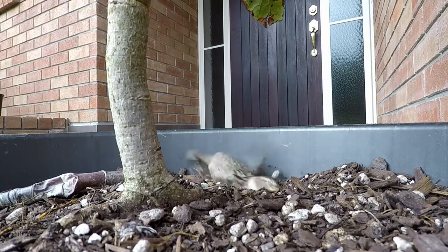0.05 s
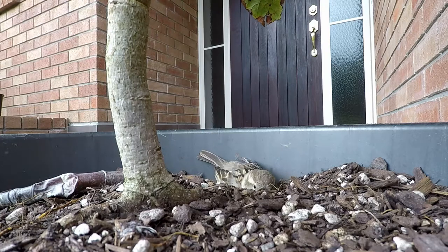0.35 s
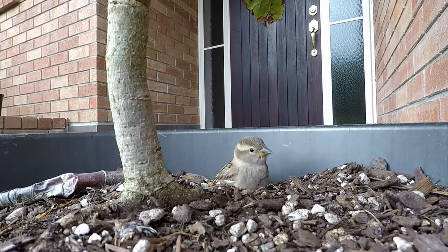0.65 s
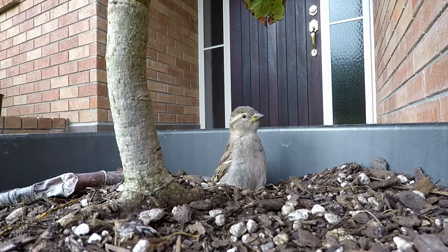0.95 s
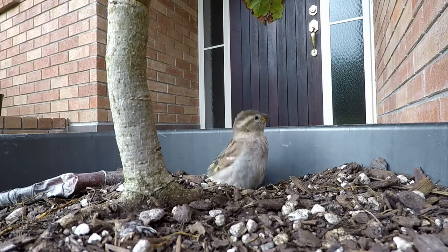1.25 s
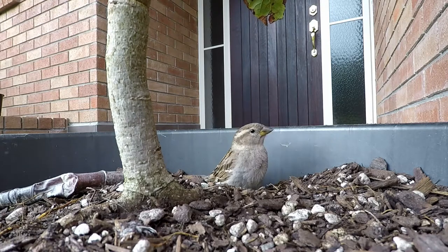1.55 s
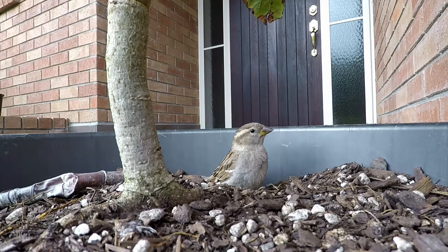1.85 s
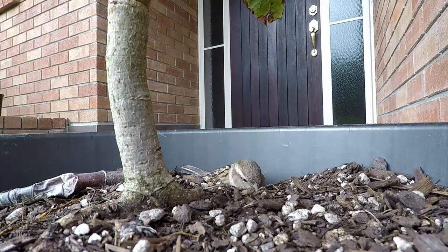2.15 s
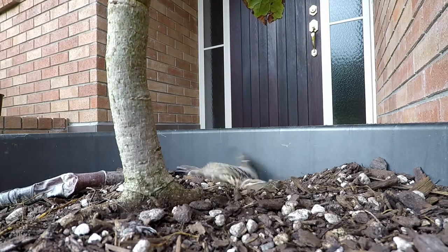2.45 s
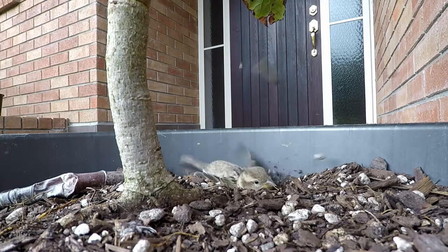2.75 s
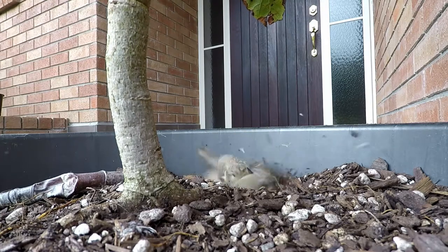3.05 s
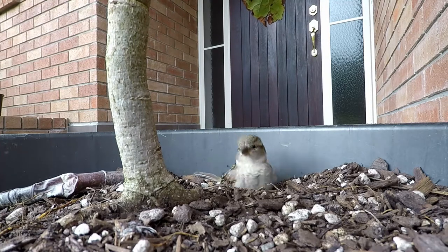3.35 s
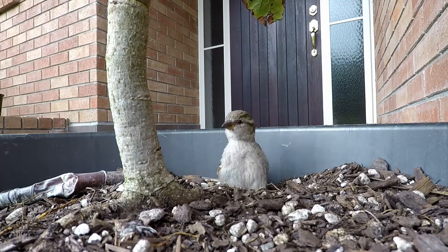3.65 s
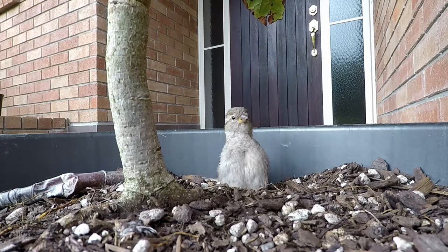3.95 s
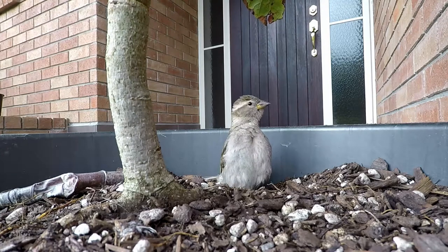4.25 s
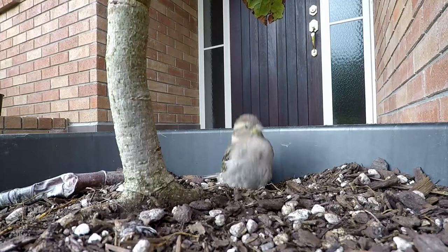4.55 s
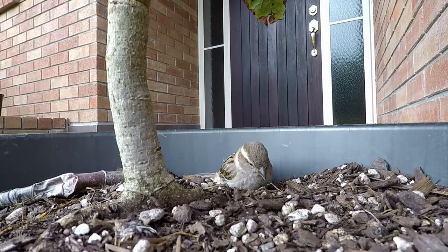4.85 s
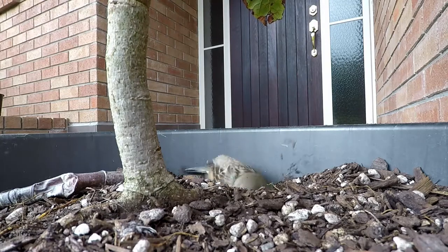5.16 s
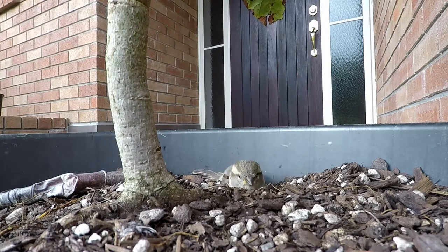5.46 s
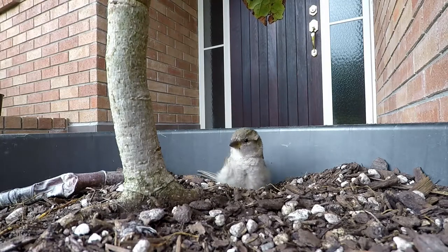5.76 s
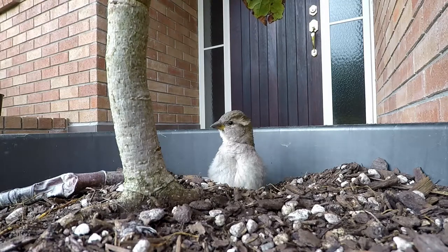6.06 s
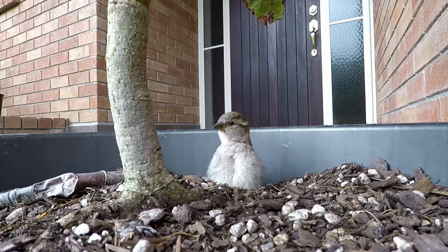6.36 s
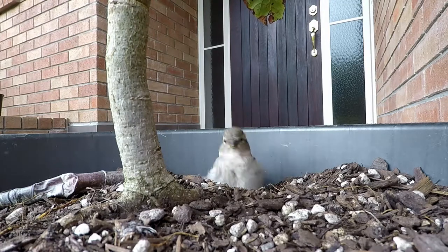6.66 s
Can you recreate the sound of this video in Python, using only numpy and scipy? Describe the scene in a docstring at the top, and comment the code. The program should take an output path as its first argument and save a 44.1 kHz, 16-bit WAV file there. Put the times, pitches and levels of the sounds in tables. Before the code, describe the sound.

A sparrow dust-bathes in a plant pot right beside the microphone. Three short bursts of soft, low wing flutter scuff dry soil and bark and send grit ticking against the pot. In the second burst a pebble knocks sharply on the microphone. Faint chirps and far hoots fill the pauses over quiet town rumble, and one nearer chirp follows the last burst.

```python
"""A sparrow dust-bathes in a plant pot, a hand's width from a small camera on the mulch.
In three bouts its wings puff air at the two microphone ports, scuff soil and bark, and fling grit
that ticks on the pot and the camera. Other birds chirp across the yard between brick walls, with
faint far hoots and one nearer call, over quiet town rumble and hiss."""
import sys
import numpy as np
from scipy import signal
from scipy.fft import rfft, irfft, next_fast_len
from scipy.io import wavfile
from scipy.ndimage import uniform_filter1d

SR = 44100
rng = np.random.default_rng(int(sys.argv[2]) if len(sys.argv) > 2 else 0)


def put_to_file(sound):
    """Save the sound as 16-bit audio at rate SR, in the file named by the first command-line argument."""
    columns = np.atleast_2d(sound).T  # one column per channel
    safe = np.clip(columns, -1, 1)
    whole_steps = np.round(safe * 32767)
    wavfile.write(sys.argv[1], SR, whole_steps.astype(np.int16))


N = 304731

# outdoor air, common to the ports and differing between them: freq_hz, density_db
AIR_MID = [(150, -77), (200, -76), (280, -81), (450, -86), (700, -90), (1000, -92.5), (1600, -95.5),
           (2600, -99), (4400, -102), (5800, -99), (7800, -102), (10000, -104), (13000, -111),
           (15000, -119)]
AIR_SIDE = [(150, -77.5), (200, -76), (280, -79.5), (450, -81), (700, -81), (1000, -82.5), (1600, -90),
            (2600, -99), (4400, -106), (5800, -100), (7800, -102), (10000, -104), (13000, -111),
            (15000, -118)]
# grains and chips landing: start_s, level_db, ring_hz, ring_db, tilt_db_per_octave, body_db, skid_db
GRAIN_HITS = [(0.0025, -36.5, 1230, 10, -1.0, 6, 20), (0.0103, -41, 1230, 9, -2, 11, -2),
              (0.059, -42, 4990, 11, -3, 4, 12), (0.076, -35.5, 1620, 11, -7.5, -5, 0),
              (0.0902, -42, 5870, 7, 2, 4, 4), (0.107, -42.5, 2400, 15, 1.0, 2, 10),
              (0.114, -43.5, 5870, 6, -7, -3, 2), (0.125, -50.5, 1250, 7, -5, -4, 6),
              (0.1378, -37.5, 1700, 10, 0, 8, -9), (0.151, -46.0, 1600, 13, -12, 4, -8),
              (0.1656, -37, 2380, 11, -1.5, 12, 8), (0.235, -45, 1710, 14, -2.5, -1, 8),
              (0.341, -43, 1470, 11, -11, 2, 14), (0.3563, -36, 1720, 6.5, -4, -8, -6),
              (0.36, -44, 1730, 8, -3, 5, -4), (0.447, -47, 1370, 3, -3, 2, 12),
              (1.333, -52, 3910, 13, 0, 2, 12), (2.5289, -34.5, 1360, 4, -9, 1, -11),
              (2.5638, -20, 1750, 4.5, -1, -3, -8), (2.5775, -37, 4600, 6, 1, 5, 2),
              (2.598, -40, 2820, 6, -3.5, -1, -2), (2.624, -36.5, 4990, 16, -5.5, 4, 12),
              (2.6512, -44.0, 1250, 7, -3, 4, 7), (2.701, -35.5, 5410, 6, -5.5, -10, -5),
              (2.707, -34.5, 5870, 4, -4, -13, -11), (2.8166, -44, 4600, 14, 5.5, 4, -1),
              (2.8885, -46, 1600, 3, -5, -1, 6), (2.924, -29.5, 5870, 6.5, -3, -14, -11),
              (2.9677, -41.5, 1360, 5, 1, 4, -3), (3.0154, -30.5, 3520, 13, 2.5, 8, -8),
              (3.0283, -43.5, 1470, 2, -1, 6, -3), (3.0378, -41, 3060, -1, -1, 4, -4),
              (3.066, -29.5, 1200, 7, 2.5, 18, -3), (3.1659, -37.5, 1730, 11, 4.5, 8, -4),
              (3.1717, -40.5, 3910, 12, 0.0, 8, -10), (3.2035, -49, 6370, 2, 5, 2, -11),
              (3.23, -49, 2820, 6, 8, 2, -12), (3.3843, -38.5, 2160, 8, -3, 16.5, 11),
              (3.442, -45, 1250, 0, -3.5, 4, 6), (3.499, -49.5, 1250, 8, 1, 4, 1),
              (3.56, -42, 5870, 8.5, 2, 7, -15), (3.603, -47.5, 5870, 10, 4, 4, -11),
              (4.6992, -50, 3370, 4, 2.0, -2, 10), (4.714, -53, 3910, 17, 2, 4, 10),
              (5.1932, -42.5, 5000, 13, -2, 7, 8), (5.215, -42, 4640, 9, 5, 4, 2),
              (5.293, -49, 1730, 17, -0.5, 4, 4), (5.367, -45.5, 1600, 7, -3, 4, -7),
              (5.38, -42, 1590, 6, 1.5, 4, 4), (5.395, -34, 1260, 6.5, -2, -7, 3),
              (5.404, -48, 2820, 7, 3.0, 3, -6), (5.4772, -49.5, 2230, 9, -2, 4, 0),
              (5.5485, -53, 2210, 21, 0, 4, -4), (5.617, -41, 1740, -1, -5, -14, 20),
              (5.8043, -50, 1600, 9, -0.5, 1, 3)]
# a pebble bouncing on the camera: start_s, level_db, thud_db, skid_db, ring_hz, ring_db
PEBBLE_HITS = [(2.7768, -19.7, -8, -6, 4050, 9), (2.7817, -35, -6, 3, 2100, 7),
               (2.7872, -17.4, 0, -6, 3350, 9), (2.7916, -32, 7, 0, 1900, 5)]
# resonances of every grain tick and of the camera case: freq_hz, gain_db
TICK_SPECTRUM = [(200, -17), (450, -9.5), (800, -16), (1100, -1.5), (1400, 3.5), (1700, 3), (2100, -2),
                 (2600, -6.5), (3300, -1.5), (4500, -11), (5200, -5.5), (5900, -2), (6800, -3.5),
                 (8200, -11.5), (12000, -22), (15000, -32)]
CASE_SPECTRUM = [(200, -0.5), (550, -9), (1000, -8.5), (1600, 1), (2000, -2), (2500, 2), (2900, -3),
                 (3450, -17.5), (4050, -13), (4550, -21), (5700, -8), (7500, -25), (9500, -27.5),
                 (12500, -37), (15000, -55)]
# left port ahead of right, from the soil and through the case: freq_hz, lead_rad
SOIL_PHASE = [(150, 0.5), (450, 3), (800, 2.5), (1270, 1.72), (1650, 1.21), (2300, 1.5), (3200, 0.56),
              (4300, -0.1), (5700, -1.64), (7200, -1.5), (10000, -1.5)]
CASE_PHASE = [(700, -.2), (1270, -1.3), (1650, -.5), (2300, .7), (3200, .5), (4300, -.6), (5700, -1.7)]
# wing beats: downstroke_s, puff_db, swirl_db, nominal_hz, upstroke_vs_down_db
WING_BEATS = [(0.012, -28.5, -26.5, 248, -20), (0.085, -38.5, -53, 215, -15), (0.185, -30.5, -21, 284, -23),
              (0.285, -41.5, -41, 205, -25), (0.46, -35.5, -37, 170, -15), (0.552, -38, -42, 196, -5.5),
              (0.636, -42, -50, 182, -5), (2.47, -34, -24, 225, -21), (2.514, -32.5, -36, 183, -9),
              (2.609, -31, -36, 180, -16), (2.696, -30.5, -33, 187, -13), (2.79, -39, -49, 263, -24),
              (2.91, -43, -42, 189, -17), (3.022, -33.5, -35, 183, -10.5), (3.066, -38.5, -37, 189, -6),
              (3.145, -45.5, -42, 224, 5), (3.233, -37.5, -45, 202, -21), (5.098, -29.5, -32, 203, -3.5),
              (5.197, -32, -32, 202, 0), (5.289, -27, -35, 195, -15), (5.384, -29.5, -32, 202, -9)]
# stirred air, rubbed bark, sprayed sand: freq_hz, gain_db
DRAUGHT_SPECTRUM = [(120, 9), (180, 10), (260, -9), (420, -8.5), (700, -14.5), (1200, -46), (3000, -81)]
BARK_SPECTRUM = [(300, -1.5), (800, -21), (1150, -6.5), (1600, -5.5), (2000, -9.5), (2500, -21),
                 (4000, -36), (9000, -55)]
SAND_SPECTRUM = [(1000, -5.5), (2200, -2.5), (3200, 3), (4400, -1), (5900, 3.5), (7200, -3), (8400, -8),
                 (11000, -14), (13500, -14), (15000, -32)]
# stereo width of stirred air: freq_hz, side_vs_mid_db
DRAUGHT_WIDTH = [(150, -6.5), (400, 8), (800, 6), (1500, -0.5)]
# shuffles in the soil: start_s, end_s, settle_s, effort_db, bark_bias_db, air_bias_db
SHUFFLES = [(0.051, 0.171, .16, -49.5, 4.5, 9), (0.347, 0.373, .03, -57.5, 8, 13.5),
            (0.439, 0.466, 0.052, -55.5, 0, 6), (2.561, 2.642, 0.066, -46, -0.5, -7),
            (2.615, 2.809, 0.072, -51.5, 4.5, 8), (2.967, 3.108, 0.15, -47.5, -0.5, 5.5),
            (5.172, 5.393, .07, -51, 0, 8.5), (5.548, 5.659, 0.18, -61.5, 2, 8)]
# far bird notes: start_s, length_s, first_hz, last_hz, level_db, tremble_ratio
CHIRP_NOTES = [(0.404, 0.056, 4080, 3380, -62, 0.055), (1.903, 0.054, 3400, 3310, -65, 0.01),
               (3.191, 0.027, 3850, 3280, -54, 0.06), (3.9, .06, 4350, 3750, -59.5, .11),
               (3.921, .075, 3300, 2900, -55.5, .016), (4.305, .065, 4050, 3550, -56, .12),
               (4.336, .062, 3300, 2830, -51.5, .025), (4.755, .055, 4400, 4050, -61.5, .1),
               (4.775, .058, 3200, 2880, -53, .014), (4.109, 0.13, 2870, 2860, -63.5, 0.061),
               (4.533, 0.089, 2690, 3050, -58.5, 0.093), (5.212, 0.075, 3410, 2960, -53, 0.024)]
HOOT_NOTES = [(2.2, 0.047, 707, 652, -59.5, 0.016), (4.27, 0.081, 680, 645, -58.5, 0.01),
              (4.72, 0.19, 663, 522, -60.5, 0.017), (6.22, 0.083, 683, 667, -65, .02),
              (6.52, 0.23, 671, 577, -61.5, 0.069)]
# nearer call, low voice: same columns
CALL_LOW_NOTES = [(5.968, .03, 3130, 3020, -54, .03)]
# nearer call, main voice (thin slide, loud drop, rough warble): time_s, pitch_hz, level_db, warble_ratio
CALL_CONTOUR = [(5.88, 5300, -65, .02), (5.889, 5120, -60, .04), (5.925, 4550, -57.5, .09),
                (5.945, 4100, -62, .06), (5.967, 3950, -63, .03), (5.971, 3780, -49, .02),
                (5.983, 3860, -44, .015), (5.996, 3130, -40.5, .03), (6.001, 3400, -47, .135),
                (6.016, 3420, -46, .135), (6.04, 3320, -56, .135)]
# echoes off brick: delay_s, gain_db
WALL_ECHOES = [(0.015, -14), (0.028, -35), (.041, -28)]
# port resonances and the camera's wind filter: freq_hz, gain_db
PORT_RESPONSE = [(4000, 0), (4900, -2), (5400, -1.5), (5800, 1.5), (6400, -1), (7500, 1), (8200, -1),
                 (9500, 0)]
WIND_FILTER = [(25, -26.5), (100, -24.5), (113, -26), (128, -15.5), (145, 2.0), (165, 0)]

BAND_LIMIT_HZ = 15400


def amp(db):
    return 10 ** (np.asarray(db) / 20)


def unit_rms(x):
    return x / np.sqrt(np.mean(x ** 2) + 1e-20)


def curve(points, hz):
    """Interpolates on a log-frequency axis."""
    knots_hz, values = np.transpose(points)
    return np.interp(np.log(hz + 1), np.log(knots_hz), values)


def tint(x, spectrum):
    """Zero-phase filter."""
    size = next_fast_len(x.shape[-1])
    gain = amp(curve(spectrum, np.fft.rfftfreq(size, 1 / SR)))
    return irfft(rfft(x, size) * gain, size)[..., :x.shape[-1]]


def stereo(mid, side):
    return np.array([mid + side, mid - side])


def add(mix, start_s, sound):
    start = round(start_s * SR)
    sound = sound[..., max(-start, 0):]
    part = mix[..., max(start, 0):][..., :sound.shape[-1]]
    part += sound[..., :part.shape[-1]]


def at_ports(direct, scattered, phase):
    """Direct sound reaches the ports out of step; scatter differs at each."""
    size = next_fast_len(len(direct))
    lead_rad = curve(phase, np.fft.rfftfreq(size, 1 / SR)) * np.array([[.5], [-.5]])
    return irfft(rfft(direct, size) * np.exp(1j * lead_rad), size)[:, :len(direct)] + scattered


def outdoor_air():
    """Steady distant town rumble and fine hiss."""
    mid, side = rng.standard_normal((2, N)) * np.sqrt(SR / 2)  # unit power per Hz
    return stereo(tint(mid, AIR_MID), tint(side, AIR_SIDE))


def resonance_db(hz, ring_hz, ring_db, width_octaves=0.14):
    """A grain's own ring: one spectral bump."""
    return ring_db * np.exp(-.5 * (np.log2((hz + 1) / ring_hz) / width_octaves) ** 2)


def struck_body(colour_db):
    """Minimum-phase response: sharp start, then ringing."""
    log_gain = np.log(amp(np.r_[colour_db, colour_db[-2:0:-1]]))
    return np.exp(np.conj(signal.hilbert(log_gain)))[:len(colour_db)]


def strike(colour_db, level_db, skid_db, phase, skid_s=0.0043, tail_db=-20, tail_s=0.036,
           catch_db=5, scatter_db=-5, smear_hz=2600):
    """Sharp blow, brief uneven skid, faint scatter from the pot. Level: energy as rms over 5 ms."""
    size = 2 * (len(colour_db) - 1)
    t, hz = np.arange(size) / SR, np.fft.rfftfreq(size, 1 / SR)
    catches = amp(catch_db * np.interp(t, np.linspace(0, t[-1], 80), rng.standard_normal(80)))
    skid = rng.standard_normal((3, size)) * catches * np.exp(-(t / skid_s) ** 2 / 2)
    skid = amp(skid_db) * unit_rms(skid)
    tail = rng.standard_normal((2, size)) * np.exp(-t / tail_s)
    tail = amp(tail_db + max(skid_db, 0)) * unit_rms(tail)
    blow = unit_rms(1. * (t == 0))
    contact = rfft(at_ports(blow + skid[0], amp(scatter_db) * skid[1:] + tail, phase))
    contact *= np.exp(-4j * np.arctan(hz / smear_hz))  # the microphone ports smear the click: lows arrive later
    tick = np.roll(irfft(contact * struck_body(colour_db)), 64, axis=1)
    return amp(level_db) * unit_rms(tick) * np.sqrt(.005 * SR / size)


def effort(bark_share=0, air_share=0, build_db=15, settle_db=14.5):
    """Shuffling amplitude: each shuffle builds (longer ones more slowly), holds, settles."""
    t, power = np.arange(N) / SR, np.zeros(N)
    for start_s, end_s, settle_s, effort_db, bark_db, air_db in SHUFFLES:
        building = np.maximum(start_s - t, 0) / max(end_s - start_s, 1 / SR)
        settling = np.maximum(t - end_s, 0) / settle_s
        held_db = effort_db + bark_share * bark_db + air_share * air_db
        power += amp(held_db - build_db * building - settle_db * settling) ** 2
    return np.sqrt(power)


def stray_grains(count=32, level_db=-49.5, fade_db=4.5, mean_flight_s=0.06,
                 low_hz=1400, high_hz=5500, ring_db=9, skid_db=-1):
    """Faint grains, flung more often at higher effort. Rows as in GRAIN_HITS."""
    jitter, chance, pitch = rng.random((count, 3)).T
    flights = -np.log(1 - chance)  # in mean flights; long fliers land farther off
    work = np.cumsum(effort())
    launch_s = np.searchsorted(work, (np.arange(count) + jitter) / count * work[-1]) / SR
    land_s = launch_s + mean_flight_s * flights
    rings_hz = low_hz * (high_hz / low_hz) ** pitch
    tilts = rng.standard_normal(count) - 0.5
    return [(start_s, level_db - fade_db * flight, ring_hz, ring_db, tilt, 0, skid_db)
            for start_s, flight, ring_hz, tilt in zip(land_s, flights, rings_hz, tilts)]


def grit(size=2048, ripple_db=3.5, lead_s=0.0015):
    """Grains tick on the pot, each with its own ring; a pebble knocks on the camera."""
    out, hz = np.zeros((2, N)), np.fft.rfftfreq(size, 1 / SR)
    for start_s, level_db, ring_hz, ring_db, tilt, body_db, skid_db in GRAIN_HITS + stray_grains():
        colour_db = curve(TICK_SPECTRUM, hz) + resonance_db(hz, ring_hz, ring_db)
        colour_db += tilt * np.log2(np.maximum(hz, 1000) / 2000)
        colour_db += curve([(800, body_db), (1200, 0)], hz)
        colour_db += ripple_db * np.interp(hz, np.linspace(0, BAND_LIMIT_HZ, 40), rng.standard_normal(40))
        add(out, start_s - lead_s, strike(colour_db, level_db, skid_db, SOIL_PHASE))
    for start_s, level_db, thud_db, skid_db, ring_hz, ring_db in PEBBLE_HITS:
        colour_db = curve(CASE_SPECTRUM, hz) + resonance_db(hz, ring_hz, ring_db)
        colour_db += curve([(700, thud_db), (1600, 0)], hz)
        knock = strike(colour_db, level_db, skid_db, CASE_PHASE, skid_s=0.0012, tail_db=-21)
        add(out, start_s - lead_s, knock)
    return out


def wings(puff_cycles=0.68, swirl_cycles=1.33, pitch_ratio=0.83, octave_db=-13, eddy_db=-7,
          wake_s=0.032, puff_boost_db=2, up_lead_s=0.055, up_nominal_hz=256):
    """Each stroke pushes a swell of air over the ports and leaves eddies. Puff is mid, swirl is side."""
    out, t = np.zeros((2, N)), np.arange(-1000, 2500) / SR
    width_cycles = np.array([[puff_cycles], [swirl_cycles]])
    for down_s, puff_db, swirl_db, nominal_hz, up_db in WING_BEATS:
        for lead_s, stroke_db, hz in [(up_lead_s, up_db, up_nominal_hz), (0, 0, nominal_hz)]:
            swell = np.exp(-.5 * (t * hz / width_cycles) ** 2)
            phase_rad = 2 * np.pi * (pitch_ratio * hz * t + rng.random((2, 1)))
            push = np.cos(phase_rad) + amp(octave_db) * swell * np.cos(2 * phase_rad)  # steepest at crest
            turbulence = unit_rms(tint(rng.standard_normal((2, len(t))), DRAUGHT_SPECTRUM))
            eddies = amp(eddy_db) * turbulence / np.sqrt(2)
            wake = np.where(t < 0, swell, np.exp(-abs(t) / wake_s))
            puff, swirl = amp(stroke_db) * (push * swell + eddies * wake)
            stroke = stereo(amp(puff_db + puff_boost_db) * puff, amp(swirl_db) * swirl)
            add(out, down_s - lead_s + t[0], stroke)
    return out


def grains(spectrum, rate_per_s, spread_db, rub_gain, scatter_db):
    """Dense tiny contacts of uneven size over a smooth rub."""
    sizes = amp(spread_db * np.minimum(rng.exponential(1, N), 4))
    clicks = (rng.random(N) < rate_per_s / SR) * sizes * rng.standard_normal((3, N))
    contacts = tint(unit_rms(clicks) + rub_gain * rng.standard_normal((3, N)), spectrum)
    return unit_rms(at_ports(contacts[0], amp(scatter_db) * contacts[1:], SOIL_PHASE))


def clumping(rate_hz=150, depth_db=2.4):
    """Soil gives way in clumps: a random gain."""
    knots = rng.standard_normal(4096)
    drift = unit_rms(np.interp(np.arange(N) / SR * rate_hz, np.arange(len(knots)), knots))
    return unit_rms(amp(depth_db * drift))


def scuffing(air_db=-2, bark_db=-1, sand_db=-0.5, air_lead_s=0.0055):
    """Feathers stir the air just before the body rubs bark chips and sprays sand."""
    t = np.arange(N) / SR
    stirring = np.interp(t + air_lead_s, t, effort(air_share=1))
    mid, side = tint(rng.standard_normal((2, N)), DRAUGHT_SPECTRUM)
    draught = amp(air_db) * stirring * unit_rms(stereo(mid, tint(side, DRAUGHT_WIDTH)))
    clumps = clumping()
    bark = grains(BARK_SPECTRUM, rate_per_s=1000, spread_db=2.8, rub_gain=.45, scatter_db=-7)
    sand = grains(SAND_SPECTRUM, rate_per_s=2400, spread_db=2.4, rub_gain=.6, scatter_db=-2)
    bark *= amp(bark_db) * effort(bark_share=0.86)
    sand *= amp(sand_db) * effort()
    return draught + clumps * (bark + sand)


def trickle(gain_db=-13, fall_s=0.2):
    """Thrown soil patters on the bark briefly after each shuffle."""
    pole = np.exp(-1 / (fall_s * SR))
    airborne = signal.lfilter([1 - pole], [1, -pole], effort() ** 2)
    patter = grains(BARK_SPECTRUM, rate_per_s=160, spread_db=2, rub_gain=.2, scatter_db=-6)
    return amp(gain_db) * np.sqrt(airborne) * patter


def whistle(pitch_hz, tremble_ratio, warble_ratio, warble_hz=170):
    """A bird's near-pure tone: random pitch tremble plus a fast, raspy warble."""
    smooth_noise = uniform_filter1d(rng.standard_normal((2, SR)), size=60)
    tremble, wander = (unit_rms(row)[:len(pitch_hz)] for row in smooth_noise)
    warble = np.sin(2 * np.pi * np.cumsum(warble_hz * (1 + .5 * wander)) / SR)
    hz = pitch_hz * (1 + tremble_ratio * tremble + warble_ratio * warble)
    return np.sqrt(2) * np.sin(2 * np.pi * np.cumsum(hz) / SR)


def gliding_notes(notes, glide_share, warble_ratio, onset_db):
    """Notes glide to a held pitch; any warble fades with the glide."""
    out = np.zeros(N)
    for start_s, length_s, first_hz, last_hz, level_db, tremble_ratio in notes:
        progress = np.arange(0, 1, 1 / (length_s * SR))
        glide = np.exp(-(progress / glide_share) ** 4)
        tone = whistle(last_hz + (first_hz - last_hz) * glide, tremble_ratio, warble_ratio * glide)
        envelope = amp(level_db + onset_db * glide) * np.sin(np.pi * progress) ** .5
        add(out, start_s, envelope * tone)
    return out


def yard(x, wet_db, t60_s, side_db):
    """Direct sound, wall echoes and a short diffuse tail."""
    t = np.arange(SR // 2) / SR
    tail = unit_rms(rng.standard_normal((2, len(t))) * amp(-60 * t / t60_s))
    mid, side = amp(wet_db) * tail / np.sqrt(len(t))
    mid[0] += 1
    for delay_s, gain_db in WALL_ECHOES:
        mid[round(delay_s * SR)] += amp(gain_db)
    response = stereo(mid, amp(side_db) * side)
    return signal.fftconvolve(x[None], response / np.linalg.norm(response[0]), axes=1)[:, :N]


def near_call():
    """One call in two voices: a short low note under a falling whistle."""
    out = gliding_notes(CALL_LOW_NOTES, glide_share=0.37, warble_ratio=0, onset_db=0)
    time_s, pitch_hz, level_db, warble_ratio = np.transpose(CALL_CONTOUR)
    t = np.arange(time_s[0], time_s[-1], 1 / SR)
    voice = whistle(np.interp(t, time_s, pitch_hz), tremble_ratio=.015,
                    warble_ratio=np.interp(t, time_s, warble_ratio))
    add(out, time_s[0], amp(np.interp(t, time_s, level_db)) * voice)
    return out


def birds():
    """Far chirps and hoots, heard mostly by their echoes, and the drier near call."""
    call = near_call()
    chirps = gliding_notes(CHIRP_NOTES, glide_share=0.37, warble_ratio=.135, onset_db=-3.5)
    hoots = gliding_notes(HOOT_NOTES, glide_share=0.43, warble_ratio=0.073, onset_db=0)
    return (yard(chirps, wet_db=9, t60_s=.3, side_db=-7)
            + yard(hoots, wet_db=27, t60_s=0.66, side_db=-24)
            + yard(call, wet_db=-2.5, t60_s=0.24, side_db=-3.5))


def scene():
    return grit() + wings() + scuffing() + trickle() + birds() + outdoor_air()


def record(dry):
    """Port resonances, steep wind filter, band limit."""
    heard = tint(tint(dry, PORT_RESPONSE), WIND_FILTER)
    lowpass = signal.firwin(255, BAND_LIMIT_HZ, window=("kaiser", 8), fs=SR)
    return signal.oaconvolve(heard, lowpass[None], "same")


dry = scene()
out = record(dry)
put_to_file(out)
```